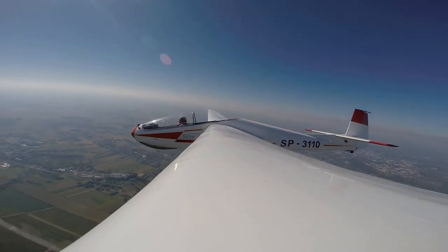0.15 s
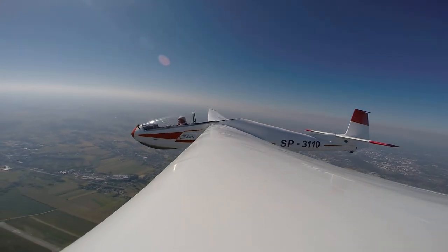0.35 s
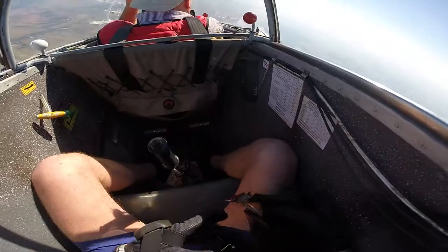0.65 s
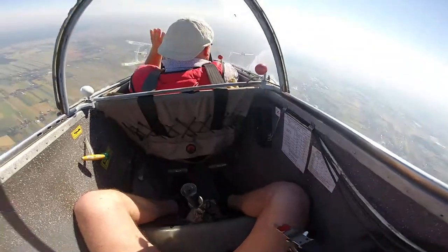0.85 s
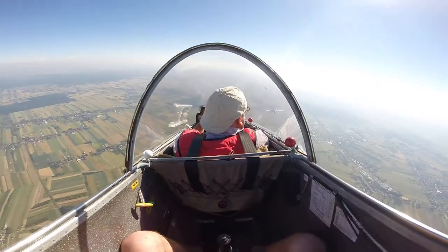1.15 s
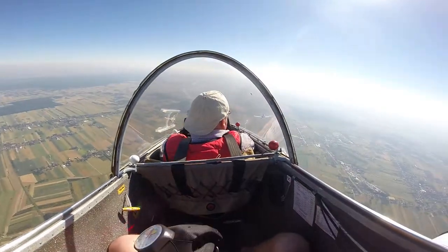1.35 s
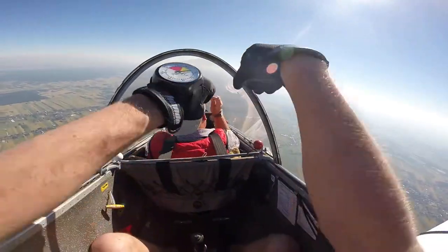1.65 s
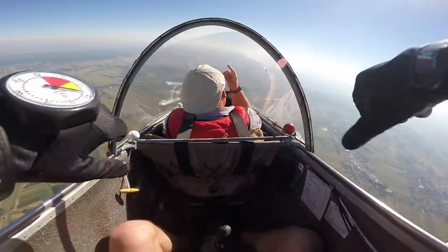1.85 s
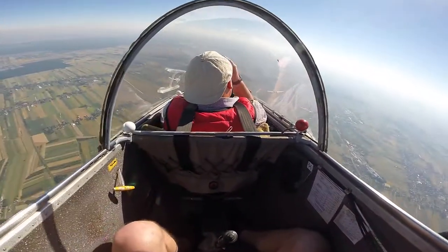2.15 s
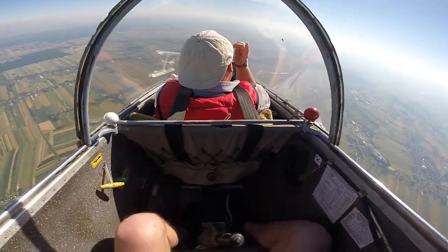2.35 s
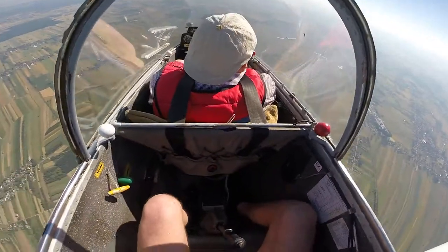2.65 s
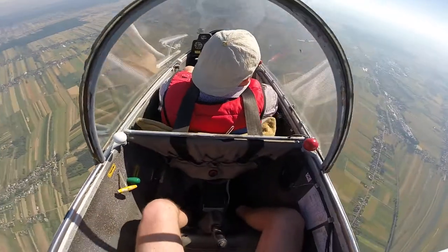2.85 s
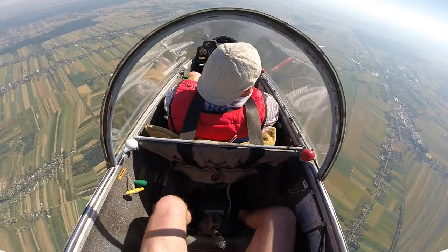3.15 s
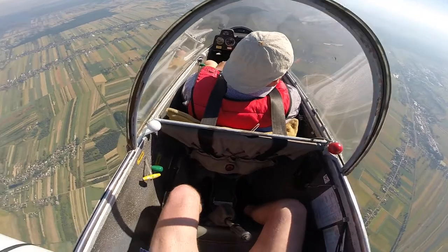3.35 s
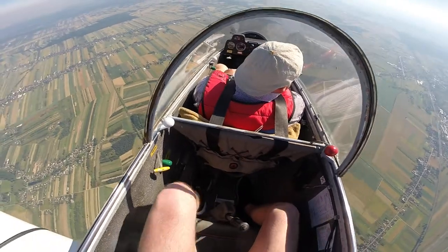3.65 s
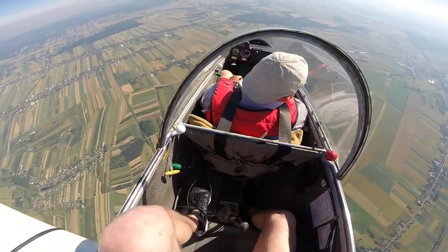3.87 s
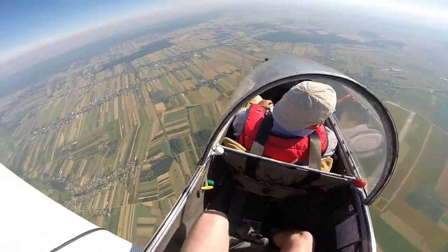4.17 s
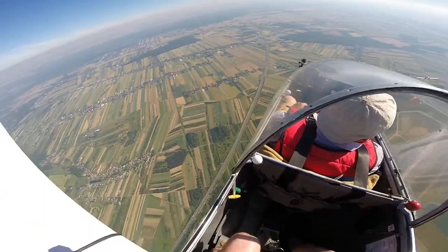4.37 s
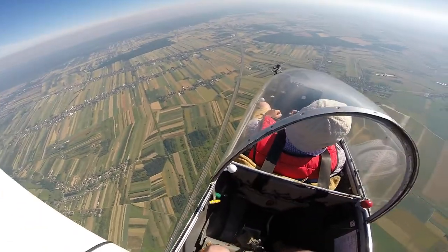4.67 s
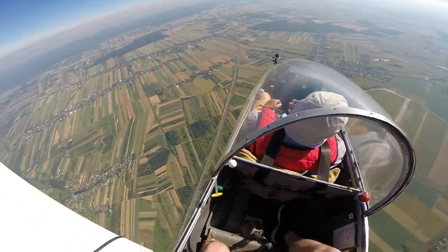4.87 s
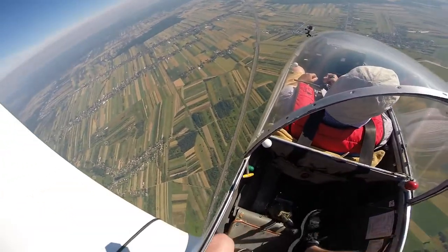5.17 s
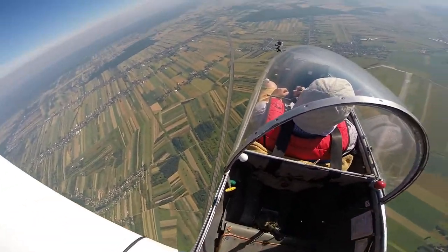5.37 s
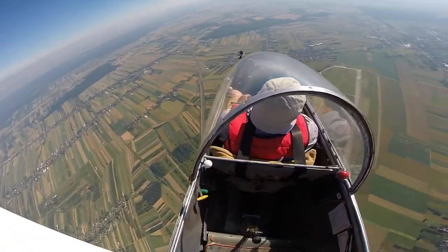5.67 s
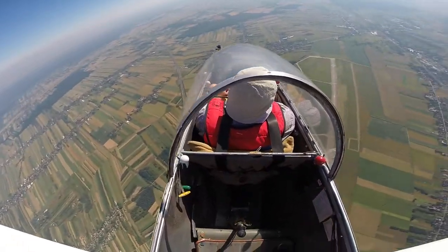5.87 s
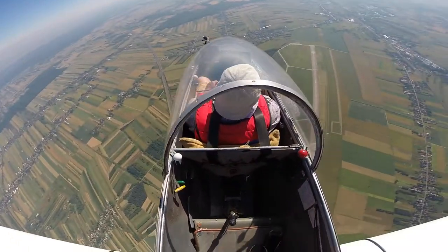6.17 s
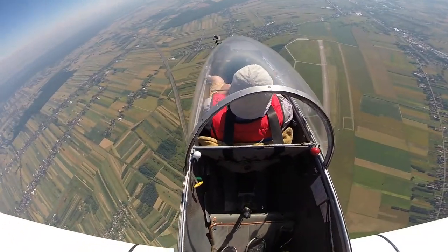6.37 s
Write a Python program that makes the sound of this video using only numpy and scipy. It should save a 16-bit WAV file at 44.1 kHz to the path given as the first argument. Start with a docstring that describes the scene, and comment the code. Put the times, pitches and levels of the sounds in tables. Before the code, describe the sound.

Steady airflow hiss jumps to lumpy microphone rumble and spitting gusts in an open glider cockpit, then a loud rushing roar with hollow moans.

```python
"""Open-cockpit glider in flight: wind on the housing of a small camera.
On the wing it is a steady hiss, shaped noise; the position then jumps to the lee of the front canopy,
where low noise thumps, gusts spit and struck metal rings.
Raised into the slipstream it roars: noise bands follow the flow, slots whistle, and narrow-band tones moan and howl."""
import sys
import numpy as np
from scipy import signal
from scipy.fft import rfft, irfft
from scipy.io import wavfile

SR = 44100
rng = np.random.default_rng(int(sys.argv[2]) if len(sys.argv) > 2 else 0)


def wav_out(sig):
    """Save sig, one row per channel (or a flat mono array), as 16-bit PCM at SR to the path in sys.argv[1]."""
    wavfile.write(sys.argv[1], SR, np.round(np.clip(np.atleast_2d(sig).T, -1, 1) * 32767).astype(np.int16))


N = 287532
T = np.arange(N) / SR
HZ = np.fft.rfftfreq(N, 1 / SR)

# Slack moments between eddies. Each row: middle in seconds, length at half height in seconds,
# loss of the buffeting in dB, loss of the lee flow in dB.
SLACKS = [(0.943, 0.015, 12, 2), (1.044, .04, 8, -1), (1.43, 0.034, 1, 1), (1.735, 0.052, 3.5, -1.5),
          (1.845, 0.016, 1.5, 0), (1.952, 0.021, 0, 2), (2.069, 0.035, 3, 5), (2.384, .025, 0, 1),
          (2.855, 0.047, 3.5, 4), (3.16, .04, 3, 0), (4.345, 0.022, 8, 0), (5.742, 0.031, 9, 0),
          (6.294, 0.028, 7, 0)]


def slipstream():
    """Open air tears past the housing: all layers follow the flow; its sharp edge trades roar for hiss."""
    # Open flow. Each row: time in seconds, flow in dB, how far it favours the sharp edge in dB.
    flow_rows = [(3.0, -26.5, -1.5), (3.13, -17, -6), (3.32, -22, -7.5), (3.4, -18, -4), (3.47, -20, -4.5),
                 (3.62, -21, -2.5), (3.94, -24.5, -4.5), (4.12, -20.5, 0), (4.36, -21.5, 5),
                 (4.6, -24, 5.5), (4.84, -23.5, 6.5), (5.2, -27, 3.5), (5.46, -25, 2.5), (5.66, -19, 2),
                 (5.88, -23.5, -1.5), (6.2, -19.5, -0.5), (6.5, -23.5, -1.5)]
    # Slips into shelter. Each row: start in seconds, length in seconds, body loss in dB, fizz loss in dB;
    # single layers take a share of these.
    shelters = [(3.398, .09, 2, 4), (5.907, 0.15, 10.5, 9.5)]
    # Treble flares as flow grazes the housing. Each row: middle in seconds, length at half height in seconds,
    # slot whistle gain in dB, fizz gain in dB.
    flares = [(3.596, .06, 6.5, -2), (3.798, .08, 4, 4), (4.377, 0.15, -3, 2)]
    # Noise spectra, the last for the housing's other side. Each row: frequency in Hz, relative density in dB.
    roar_colour = [(120, -37), (200, -6), (322, -4), (452, -7.5), (838, -13), (1040, -13), (1300, -14),
                   (1690, -37), (2860, -120)]
    rush_colour = [(700, -18.5), (1050, -13.5), (1300, -3.5), (1520, 0.5), (1750, -3), (1930, -2),
                   (2300, -14.5), (3500, -31), (6000, -51)]
    edge_colour = [(1300, -35), (1900, -4.5), (2250, -1.5), (2600, 2), (3000, -0.5), (3350, 2), (3600, -4),
                   (3850, -12), (4300, -16), (4800, -20.5), (8000, -59)]
    fizz_colour = [(4300, -7), (5000, -8), (5600, -3), (6300, -1), (7000, -6.5), (7500, -6.5),
                   (8250, -15.5), (9000, -16.5), (9700, -12), (10350, -9.5), (11000, -15.5), (12500, -21),
                   (14000, -23), (15200, -27)]
    turned_colour = [(4500, -24), (5100, -22), (5600, -7), (6300, -1), (7000, -8), (7450, -1), (8300, -18),
                     (9000, -15), (9900, -10), (11000, -17), (12500, -23), (15200, -29)]
    # Air resonances of the housing slots. Each row: centre in Hz, width in Hz, relative peak in dB.
    slots = [(6060, 340, -1.5), (5700, 290, -16), (6700, 220, -13.5), (4030, 300, -8.5), (3590, 250, 1.5)]

    usual_flow_db = -22
    body_return_s, treble_return_s = 0.15, 0.04  # treble comes back first
    flow_db, angle_db = curves(flow_rows)
    surge_db = flow_db - usual_flow_db
    body_loss_db = sum(db * sheltered(s, length, body_return_s) for s, length, db, _ in shelters)
    edge_loss_db = sum(db * sheltered(s, length, treble_return_s) for s, length, db, _ in shelters)
    fizz_loss_db = sum(db * sheltered(s, length, treble_return_s) for s, length, _, db in shelters)
    wake_db = 15 * (1 - ramp(2.968, length_s=0.12))  # treble is last to clear the canopy wake
    slot_flare_db = swells([(s, length, db) for s, length, db, _ in flares])
    fizz_flare_db = swells([(s, length, db) for s, length, _, db in flares])
    turned = ramp(5.9, length_s=0.15)  # other side of the housing swings into the flow

    roar_db = -27 + 0.51 * surge_db - 0.4 * angle_db - 0.77 * body_loss_db
    rush_db = flow_db - body_loss_db
    edge_db = 1.05 + flow_db + angle_db - edge_loss_db - 0.4 * wake_db
    slot_db = -34 + 0.95 * surge_db + 7.4 * turned + slot_flare_db - 0.55 * fizz_loss_db - wake_db
    fizz_db = -33 + 0.4 * surge_db + 0.2 * angle_db - 4.5 * turned
    fizz_db += fizz_flare_db - fizz_loss_db - wake_db

    speed = eddies(slow_hz=29, fast_hz=260)  # the same eddies shake these five layers
    roar = gain_of(roar_db) * noise(roar_colour) * flutter(speed, depth_db=1.4)
    rush = gain_of(rush_db) * noise(rush_colour) * flutter(speed, depth_db=1.0)
    edge = gain_of(edge_db) * noise(edge_colour) * flutter(speed, depth_db=1.05)
    slot = gain_of(slot_db) * whistle(slots) * flutter(speed, depth_db=1.0)
    spray = np.sqrt(1 - turned) * noise(fizz_colour) + np.sqrt(turned) * noise(turned_colour)
    fizz = gain_of(fizz_db) * spray * flutter(speed, depth_db=1.1)
    return roar + rush + edge + slot + fizz + moan() + howl()


def moan():
    """Vortices shed by the housing make rough, hollow tones that swell, slide and fade."""
    # Each row: start in seconds, length in seconds, first pitch in Hz, last pitch in Hz,
    # relative level in dB.
    moans = [(3.051, 0.19, 381.4, 352, -28.5), (3.081, 0.15, 760, 699, -31), (3.2, 0.26, 510, 545, -33),
             (3.519, 0.16, 519, 554, -29.5), (3.621, .5, 649, 766, -31.5), (4.12, 0.32, 335, 383, -27.5),
             (4.34, .15, 568, 520, -32), (4.72, .34, 330, 341, -30), (5.532, 0.31, 356.6, 281, -27),
             (6.15, 0.34, 375, 407, -27.5)]
    out = np.zeros(N)
    for s, length, first_hz, last_hz, db in moans:
        u = np.linspace(0, 1, int(length * SR), endpoint=False)
        pitch_hz = first_hz + (last_hz - first_hz) * u
        swell = np.sin(np.pi * u) ** 0.57
        start = round(s * SR)
        out[start:start + len(u)] += gain_of(db + 1.0) * swell * wandering(pitch_hz, width_hz=166)
    return out


def howl():
    """Flow striking a cavity of the housing squarely: a breathy tone of fixed pitch."""
    # Each row: time in seconds, gain in dB.
    howl_rows = [(3.0, -44), (3.3, -33), (3.6, -26), (3.9, -29), (4.1, -59), (6.52, -60)]
    gain_db, = curves(howl_rows)
    return gain_of(gain_db) * whistle([(1520, 190, 0)])  # centre Hz, width Hz, dB


def buffet(exposed):
    """Eddies pound the microphone: lumpy low pressure noise with single thumps and slack moments."""
    # Eddy strength. Each row: time in seconds, relative level in dB.
    strength_rows = [(0.59, -13), (0.85, -12.5), (1.2, -11), (1.75, -13), (2.35, -14.5), (3.0, -12.5),
                     (3.2, -16), (3.72, -12.5), (3.92, -19.5), (4.3, -19.5), (4.65, -22.5), (5.0, -24),
                     (5.25, -25), (5.65, -20), (6.2, -15), (6.52, -17)]
    # Large single eddies. Each row: middle in seconds, length at half height in seconds, gain in dB.
    thumps = [(0.642, 0.035, 4), (0.86, .07, 4.5), (1.006, 0.019, 2.5), (1.52, 0.047, 3.5),
              (1.675, 0.019, 4), (1.895, 0.025, 7.5), (3.045, 0.046, 7), (4.02, 0.037, 5), (4.82, 0.032, 6),
              (4.98, 0.086, 5), (5.81, 0.044, 5), (6.145, 0.028, 2)]
    # Pressure spectra in the lee and in the open. Each row: frequency in Hz, relative density in dB.
    lee_colour = [(8.8, -52), (15, -14), (59, -8), (97, -0.5), (114, 0), (152, -5), (187, -14.5),
                  (329, -26), (362, -29), (399, -30.5), (541, -36), (700, -52), (910, -69), (1540, -120)]
    open_colour = [(20, -17), (40, -14), (60, -7), (85, -1), (105, 1), (148, -0.5), (200, -7), (250, -13.5),
                   (320, -18.5)]

    strength_db, = curves(strength_rows)
    slack_db = swells([(s, length, db) for s, length, db, _ in SLACKS])
    push = np.sqrt(1 - exposed) * noise(lee_colour) + np.sqrt(exposed) * noise(open_colour)
    return gain_of(strength_db + swells(thumps) - slack_db - 0.74) * sustained(push, span_s=0.11)


def lee():
    """Gusts reach behind the canopy over its rim hiss; the spitting treble follows the flow most keenly."""
    # Flow spilling round the canopy. Each row: time in seconds, flow in dB.
    flow_rows = [(0.6, -36), (0.84, -35), (0.96, -38.5), (1.1, -37.5), (1.2, -34), (1.63, -34.5),
                 (1.7, -39.5), (1.83, -42), (1.865, -34), (2.55, -36), (2.68, -38.5), (2.86, -39),
                 (2.92, -34.5)]
    # Hiss along the canopy rim. Each row: time in seconds, gain in dB.
    rim_rows = [(0.6, -35), (0.8, -34), (1.0, -36.5), (1.3, -40.5), (1.6, -39), (1.82, -43.5), (2.0, -43),
                (2.6, -36.5), (3.0, -40.5)]
    # Gusts into the lee. Each row: middle in seconds, length at half height in seconds, fizz gain in dB.
    gusts = [(1.492, .04, 7), (1.598, 0.028, 5), (1.919, 0.022, 8), (2.015, 0.043, 4.5), (2.127, 0.024, 4),
             (2.18, 0.026, 9), (2.262, 0.039, 8), (2.356, 0.021, 10.5), (2.468, 0.051, 6.5),
             (2.555, 0.025, 6), (2.915, .03, 3)]
    # Noise spectra. Each row: frequency in Hz, relative density in dB.
    rush_colour = [(290, -13), (500, -1.5), (735, -8), (891, -7), (1130, -7), (1400, -1.5), (1610, -4),
                   (1860, -4), (2180, -7.5), (2860, -10), (3100, -12.5), (4500, -20), (5040, -22.5),
                   (5980, -22.5), (7500, -26.5), (9750, -52), (16500, -120)]
    fizz_colour = [(2350, -39), (4000, -5.5), (4500, -3.5), (5050, -13.5), (5770, -7), (5970, -5),
                   (6450, -8), (7130, -11), (8290, -15.5), (11000, -17), (12600, -22.5), (15100, -28)]
    # Air resonances of housing and rim. Each row: centre in Hz, width in Hz, relative peak in dB.
    slots = [(2700, 270, -7), (5910, 320, -9.5), (1476, 170, 2), (1860, 330, 3)]
    rim_slots = [(2800, 370, 3.5), (3340, 290, -0.5), (3560, 160, -13)]

    usual_flow_db = -35.5
    slack_db = swells([(s, length, db) for s, length, _, db in SLACKS])
    flow_db = curves(flow_rows)[0] - slack_db
    rim_db, = curves(rim_rows)
    gust_db = swells(gusts)
    rush_db = flow_db + 0.44 * gust_db
    fizz_db = -52.5 + 1.8 * (flow_db - usual_flow_db) + gust_db

    speed = eddies(slow_hz=8.2, fast_hz=220)
    rush = gain_of(rush_db) * (gain_of(2.5) * noise(rush_colour) + gain_of(1) * whistle(slots))
    spitting = 0.5 + 0.7 * spits(per_s=240, decay_s=0.0033, spread_db=5.5)
    fizz = gain_of(fizz_db) * noise(fizz_colour) * spitting
    rim = gain_of(rim_db) * whistle(rim_slots) + gain_of(-54.5) * noise(fizz_colour)
    return (rush + fizz) * flutter(speed, depth_db=2.0) + rim


def wing():
    """Fast, smooth air over the wing: an even, bright hiss with a whistle and little rumble."""
    # Airflow. Each row: time in seconds, gain in dB.
    flow_rows = [(0, -17), (0.3, -16), (0.58, -17)]
    # Noise spectra. Each row: frequency in Hz, relative density in dB.
    rumble_colour = [(22, -15), (35, -10), (50, 4.5), (68, -9), (110, -2.5), (150, 4), (178, -10),
                     (205, -5), (250, -10), (450, -10.5), (600, -19), (1000, -19)]
    rush_colour = [(590, -45), (1000, -15), (1060, -17), (1410, -0.5), (1900, 0), (2300, -2), (2510, -3.5),
                   (2920, -4.5), (3630, -14), (4450, -9.5), (5050, -16), (6230, -8.5), (6440, -5.5),
                   (7010, -27), (7500, -30), (9750, -56), (16500, -120)]
    fizz_colour = [(4120, -30), (7000, -2), (7910, -10), (9410, -1), (10800, -9), (12600, -7.5),
                   (13700, -17), (15100, -22)]
    # Air resonances of the housing slots. Each row: centre in Hz, width in Hz, relative peak in dB.
    slots = [(6190, 250, 0), (5520, 250, -5.5), (2280, 180, -2)]

    gain_db, = curves(flow_rows)
    speed = eddies(slow_hz=30, fast_hz=304)
    hiss = gain_of(1.0) * noise(rush_colour)
    hiss += gain_of(-8.5) * whistle(slots)
    hiss += gain_of(-18.5) * noise(fizz_colour)
    rumble = gain_of(-7) * sustained(noise(rumble_colour), span_s=0.14)
    return gain_of(gain_db) * (hiss * flutter(speed, depth_db=0.5) + rumble)


def clinks():
    """Things touched in the cockpit: dry taps on fittings and small metal parts knocking together."""
    # Taps on the fittings. Each row: start in seconds, peak in dB.
    tap_rows = [(0.7, -17), (0.7217, -13), (0.8955, -26)]
    # Clinks of loose metal. Each row: start in seconds, peak in dB, factor on the ring pitches,
    # hardness in dB per octave.
    clink_rows = [(0.8545, -23, 0.96, -3), (0.8635, -28, 0.87, -6), (0.9196, -30, .955, 2),
                  (1.4908, -27.5, 0.96, -14)]
    # Ring modes. Each row: frequency in Hz (before the pitch factor), relative level in dB, t60 in seconds.
    fitting = [(1600, 4, 0.016), (1970, -8, .015), (2780, 0, .018), (3350, -8, .02), (5270, -14, 0.039)]
    metal = [(5750, -2, .04), (6100, -5, .03), (6560, -5, .04), (7400, 0, .06), (7750, -7, .03),
             (8850, -11, .04), (10500, -7, .045), (12050, -15, .03), (13420, -5, .045), (15100, -14, .03)]

    taps = sum(strike(s, db, fitting, scrape_db=-28) for s, db in tap_rows)
    knocks = sum(strike(s, db, metal, scrape_db=-2, pitch=pitch, tilt_db=hardness)
                 for s, db, pitch, hardness in clink_rows)
    return taps + knocks


def strike(s, peak_db, modes, scrape_db, pitch=1, tilt_db=0):
    """One blow: a short noise scrape and decaying modes; a harder blow favours scrape and high modes."""
    t = np.arange(SR // 8) / SR
    sound = rng.standard_normal(len(t)) * gain_of(scrape_db + tilt_db - 60 * t / 0.02)
    for hz, db, t60_s in modes:
        octaves = np.log2(hz / modes[0][0])
        decay = gain_of(db + tilt_db * octaves - 60 * t / t60_s)
        sound += decay * np.sin(2 * np.pi * (hz * pitch * t + rng.random()))
    sound *= 1 - np.exp(-(t / 0.00049) ** 2)  # contact builds up
    out = np.zeros(N)
    out[round(s * SR):][:len(t)] = gain_of(peak_db) * sound / abs(sound).max()
    return out


def noise(colour):
    """Turbulence noise with a spectrum drawn through (Hz, dB) points, falling away beyond them."""
    f, db = np.transpose(colour)
    below = np.minimum(1, (HZ + 1) / f[0]) ** 2
    above = np.minimum(1, f[-1] / (HZ + 1)) ** 2
    return shaped(below * above * gain_of(np.interp(np.log(HZ + 1), np.log(f), db)))


def whistle(slots):
    """Turbulence ringing in air resonances: fuzzy whistles."""
    return shaped(sum(gain_of(db) / (1 + (2 * (HZ - hz) / width) ** 2) for hz, width, db in slots))


def wandering(hz, width_hz):
    """Narrow-band noise whose centre follows a pitch curve."""
    n = len(hz)
    phase = 2 * np.pi * np.cumsum(hz) / SR
    narrow = 1 / (1 + (2 * np.fft.rfftfreq(n, 1 / SR) / width_hz) ** 2)
    a, b = irfft(rfft(rng.standard_normal((2, n))) * narrow, n)
    return unit_rms(a * np.cos(phase) + b * np.sin(phase))


def eddies(slow_hz, fast_hz):
    """Random swings of air speed between two rates, the slower ones larger."""
    highpass = HZ ** 2 / (HZ ** 2 + slow_hz ** 2)
    lowpass = 1 / (1 + (HZ / fast_hz) ** 2)
    return shaped(highpass * lowpass / np.sqrt(HZ + slow_hz))


def flutter(speed, depth_db):
    """Gain that swings of air speed put on a noise, with a mean power of one."""
    return unit_rms(gain_of(depth_db * speed))


def spits(per_s, decay_s, spread_db):
    """Gain of tiny eddies bursting at the port: each starts at once, its power dying in milliseconds."""
    starts = rng.random(N) < per_s / SR
    power = gain_of(spread_db * np.minimum(rng.exponential(1, N), 3)) ** 2 * starts
    decaying = signal.lfilter([1], [1, -np.exp(-1 / (decay_s * SR))], power)
    return unit_rms(np.sqrt(decaying))


def sustained(x, span_s):
    """Flow of steadier strength: keeps the quick lumps of a noise and evens its slow swells."""
    power = signal.fftconvolve(x ** 2, signal.windows.hann(int(span_s * SR) | 1), "same")
    return unit_rms(x / np.sqrt(power + 0.11 * power.mean()))


def swells(rows):
    """Sum in dB of smooth bumps given by middle, length at half height and size."""
    return sum(db * np.cos(np.pi / 2 * np.clip((T - s) / length, -1, 1)) ** 2 for s, length, db in rows)


def sheltered(start_s, length_s, return_s):
    """Goes from 0 to 1 as the flow is cut off, holds, and goes back as the flow returns."""
    return ramp(start_s, length_s=0.033) - ramp(start_s + length_s, return_s)


def ramp(start_s, length_s):
    """Linear rise from 0 to 1."""
    return np.clip((T - start_s) / length_s, 0, 1)


def curves(rows):
    """Each column after the time as a curve over all samples."""
    s, *columns = np.transpose(rows)
    return [np.interp(T, s, c) for c in columns]


def shaped(gain):
    """Noise of unit rms with the given relative gain at each frequency."""
    return unit_rms(irfft(rfft(rng.standard_normal(N)) * gain, N))


def unit_rms(x):
    """Scales to an rms of one."""
    return x / np.sqrt(np.mean(x ** 2) + 1e-20)


def gain_of(db):
    """Decibels to amplitude."""
    return 10 ** (np.asarray(db) / 20)


def scene():
    """Wing, then cockpit, where the housing rises out of the lee into the slipstream."""
    inside = ramp(0.577, length_s=0.0072)  # abrupt jump from wing to cockpit
    exposed = ramp(2.86, length_s=0.19)
    cockpit = np.sqrt(exposed) * slipstream() + buffet(exposed) + np.sqrt(1 - exposed) * lee() + clinks()
    return ((1 - inside) * wing() + inside * cockpit)[None]


def record(dry):
    """Rounds the largest swings softly, then limits the band with a linear-phase low-pass."""
    edge_hz = 15280
    rounded = np.tanh(dry)
    lowpass = signal.firwin(901, edge_hz, window=("kaiser", 9), fs=SR)
    return signal.oaconvolve(rounded, lowpass[None], "same")


dry = scene()
out = record(dry)
wav_out(out)
```